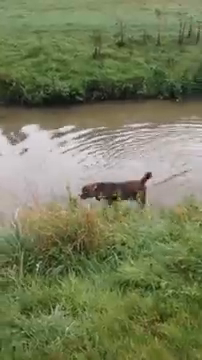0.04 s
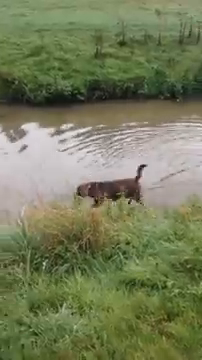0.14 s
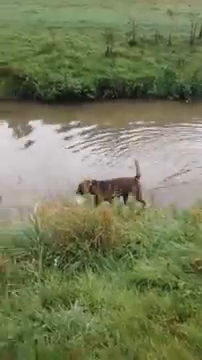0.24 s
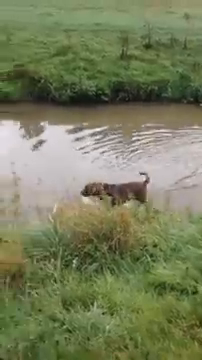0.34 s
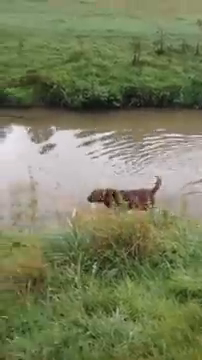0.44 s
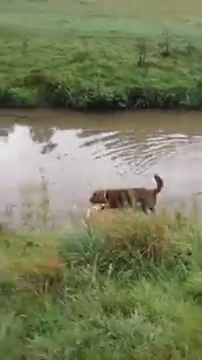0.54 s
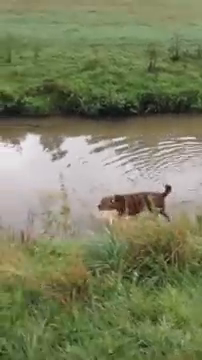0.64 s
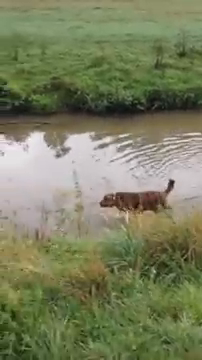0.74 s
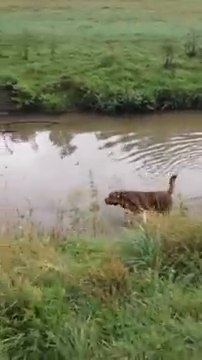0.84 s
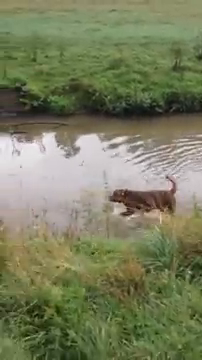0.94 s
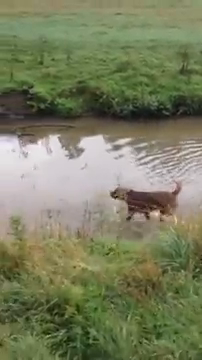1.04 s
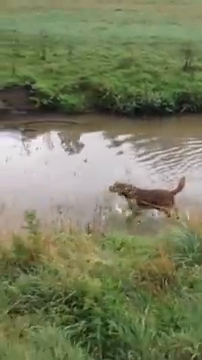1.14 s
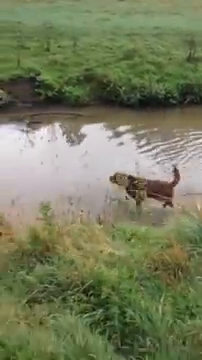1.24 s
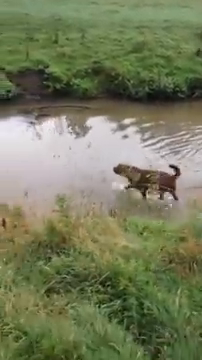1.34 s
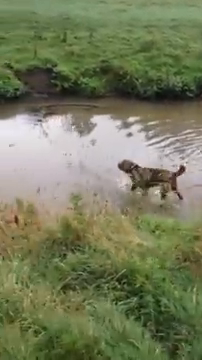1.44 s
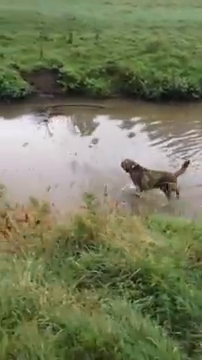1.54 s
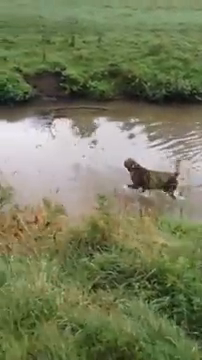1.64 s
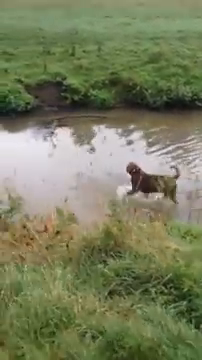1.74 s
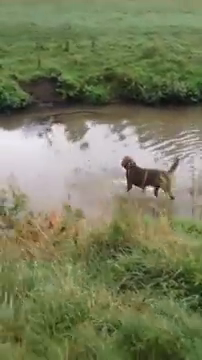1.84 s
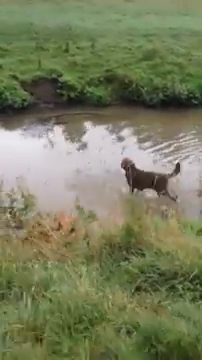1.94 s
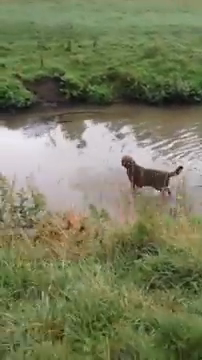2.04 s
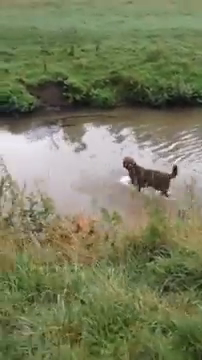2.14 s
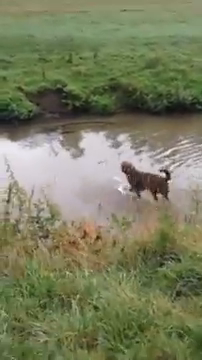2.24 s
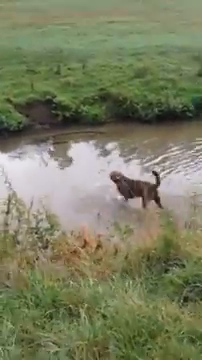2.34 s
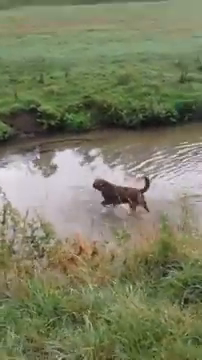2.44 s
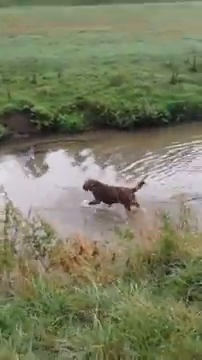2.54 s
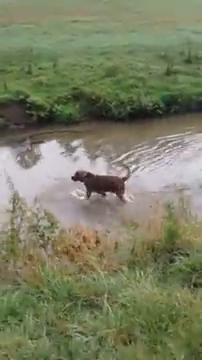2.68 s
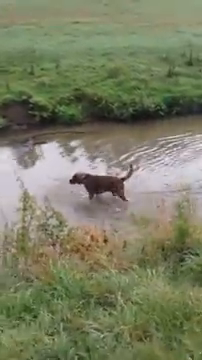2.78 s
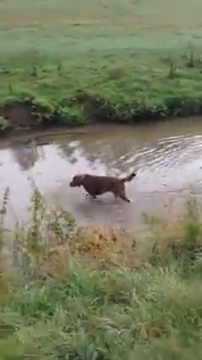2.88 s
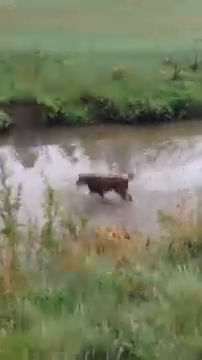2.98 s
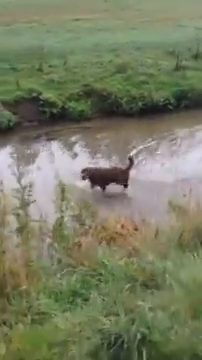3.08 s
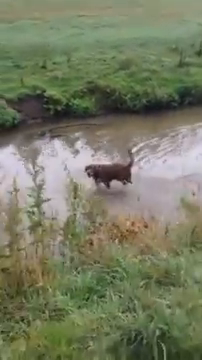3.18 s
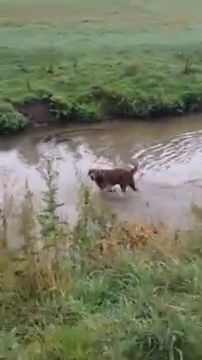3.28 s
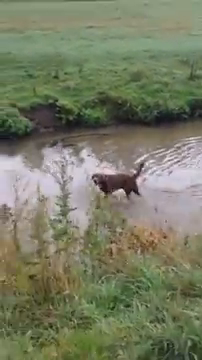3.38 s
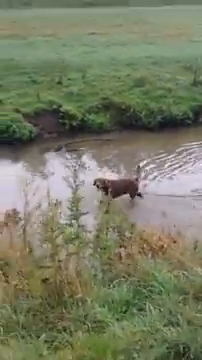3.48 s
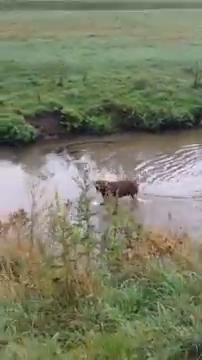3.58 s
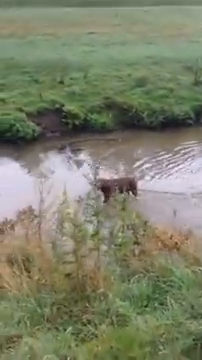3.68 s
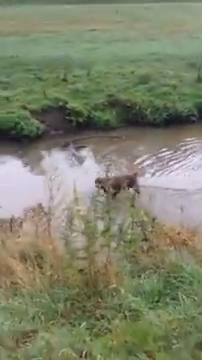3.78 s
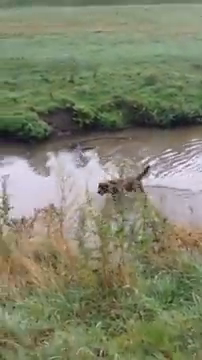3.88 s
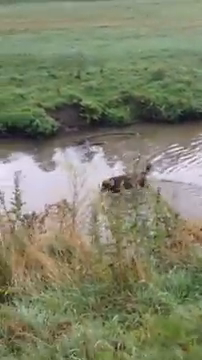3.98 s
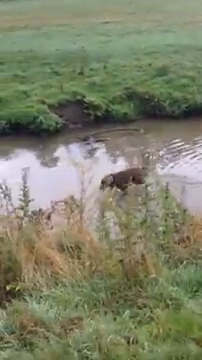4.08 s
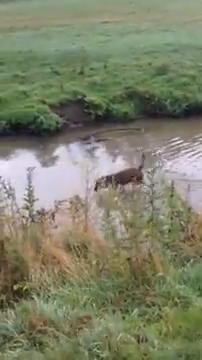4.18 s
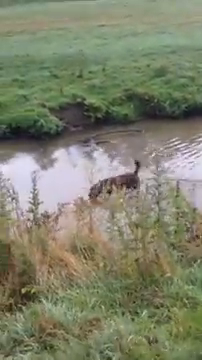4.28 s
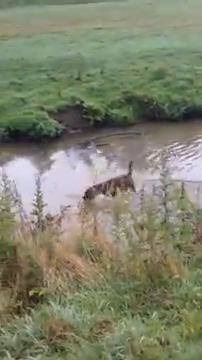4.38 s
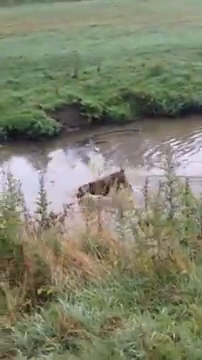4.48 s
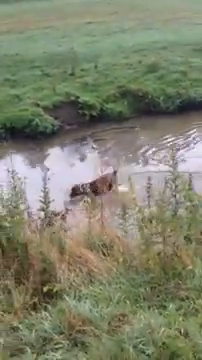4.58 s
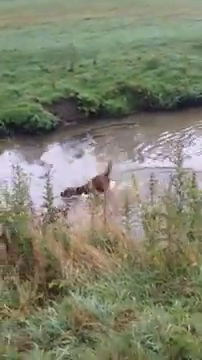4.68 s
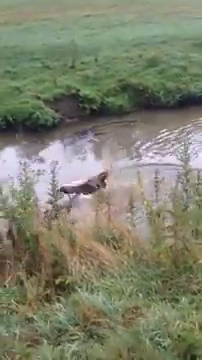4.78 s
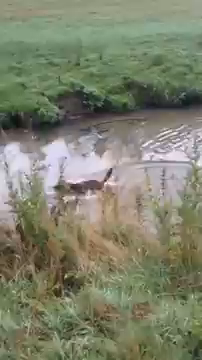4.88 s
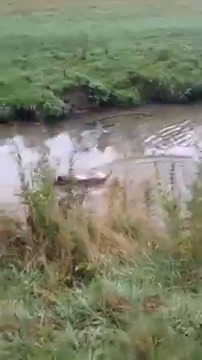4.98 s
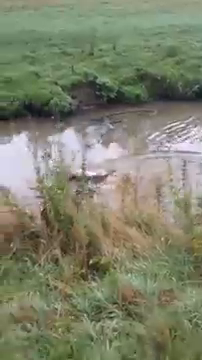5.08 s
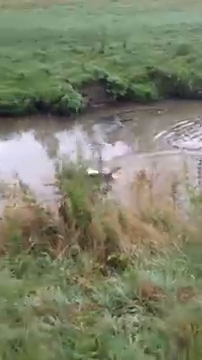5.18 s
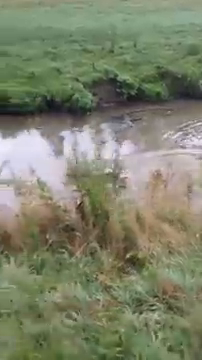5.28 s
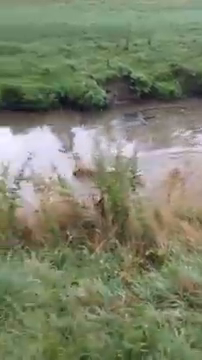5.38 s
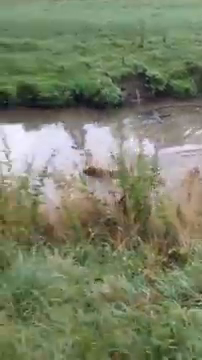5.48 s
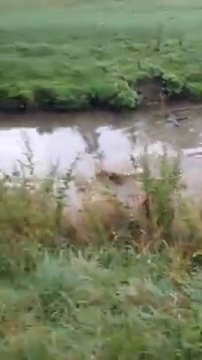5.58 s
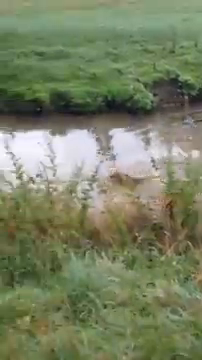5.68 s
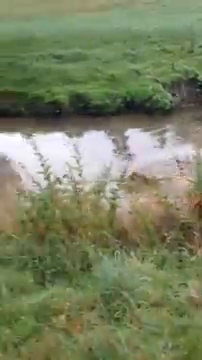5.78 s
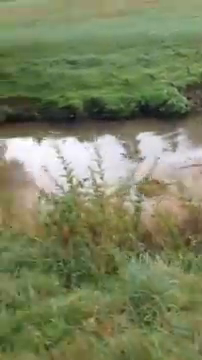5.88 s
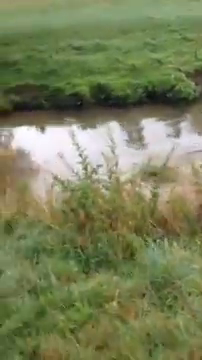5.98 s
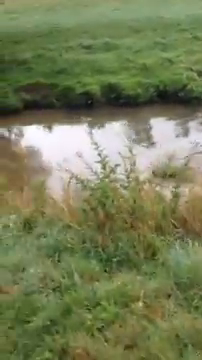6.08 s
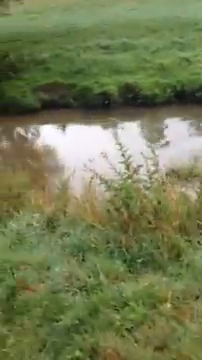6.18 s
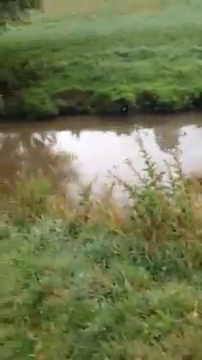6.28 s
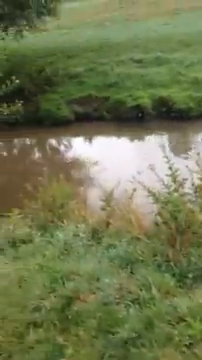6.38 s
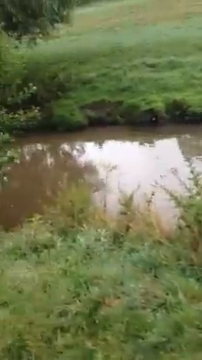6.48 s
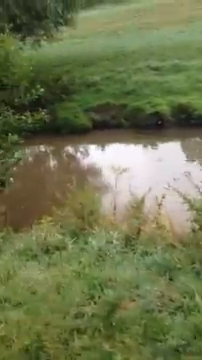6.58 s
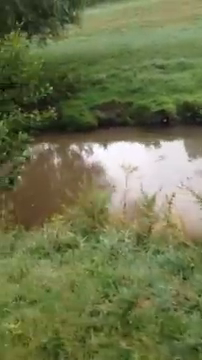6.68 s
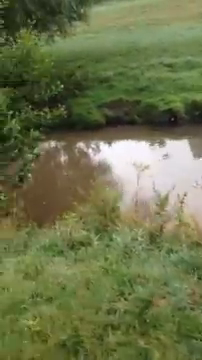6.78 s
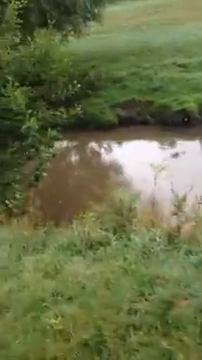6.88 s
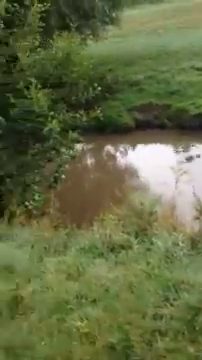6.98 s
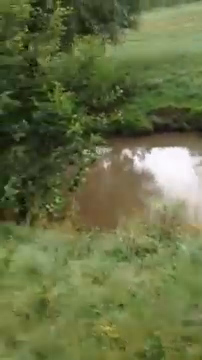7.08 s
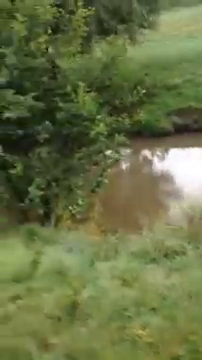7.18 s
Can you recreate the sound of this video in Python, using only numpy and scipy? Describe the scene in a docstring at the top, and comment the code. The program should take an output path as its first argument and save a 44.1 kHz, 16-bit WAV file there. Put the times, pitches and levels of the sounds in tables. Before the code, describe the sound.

A dog wades along a shallow river, its legs making irregular splashes, bubbly plops and a patter of spray. The sound turns deeper and more gurgling as it starts to swim, then fades to small drips, with two faint grunts farther off. Heard from a grassy bank, where light wind thumps on the microphone, tall grass rustles softly near the end and the open field hisses quietly.

```python
"""Splashes and plops of a dog wading, then swimming, along a shallow river, heard from the grassy bank.
Each leg stroke traps air that rings as short bubbles, slaps the surface and throws spray.
Late on, farther off, come two soft grunts. Close by, a light wind buffets the microphone
and tall grass brushes near it; the open field hisses quietly behind."""
import sys
import numpy as np
from scipy import signal
from scipy.fft import rfft, irfft
from scipy.io import wavfile
from scipy.ndimage import uniform_filter1d

SR = 44100
rng = np.random.default_rng(int(sys.argv[2]) if len(sys.argv) > 2 else 0)


def materialize(psi):
    """Save the field psi as 16-bit PCM at rate SR to the path in sys.argv[1].

    A 1-D psi becomes a single channel; in a 2-D psi each row is a channel.
    """
    bounded = np.clip(np.atleast_2d(psi).T, -1, 1)
    quanta = np.round(bounded * 32767).astype(np.int16)
    wavfile.write(sys.argv[1], SR, quanta)


N = 318843

# The dog's legs, out in the river: peak_s, spray_db, gurgle_db, rise_s, fall_s (both per 10 dB)
LEG_STROKES = [(0.02, -47, -56, .04, .03), (0.1, -47.5, -47, .06, .22), (0.26, -47, -64, .03, .08),
               (0.363, -52, -56, .02, .04), (0.46, -48, -45, .08, .05), (0.62, -50, -62, .06, .2),
               (0.747, -46, -54, .012, .015), (0.84, -46, -47, .06, .03), (1.22, -47, -44, .08, .04),
               (1.6, -45, -45, .12, .1), (1.92, -47, -46, .04, .2), (2.335, -52, -52, .04, .03),
               (2.393, -45, -42, .008, .04), (2.745, -48, -45, .03, .1), (2.92, -52, -56, .05, .05),
               (2.98, -48, -46, .04, .07), (3.265, -48, -47, .03, .1), (3.46, -49, -49, .09, .07),
               (3.75, -53, -42, .08, .1), (3.93, -55, -54, .04, .06), (4.21, -54, -48, .04, .1),
               (4.39, -46, -48, .08, .24), (4.67, -52, -44, .05, .2), (4.765, -42.5, -49, .11, .11),
               (5.05, -46.5, -49, .17, .06), (5.41, -51, -54, .3, .1), (6.44, -61, -62, .03, .2),
               (6.73, -58, -55, .02, .14)]
# Water pushed aside between strokes as the river deepens: time_s, spray_db, gurgle_db, deep_gurgle_db
WADING = [(0, -54, -62, -9), (.55, -54, -62, -9), (0.93, -49, -55, -8), (1.1, -51, -59, -8),
          (1.5, -49, -62, -6), (2.22, -54, -58, -7), (2.62, -49.5, -53, -7), (2.88, -56, -56, -7),
          (3.17, -53, -54, -5), (3.62, -59, -60, -5), (4.1, -55, -55, -6), (4.5, -56, -53, -1),
          (4.9, -56, -51, 3), (5.5, -58, -56, 2), (6.0, -63.5, -62, 1), (6.36, -66, -67, 1),
          (6.59, -62.5, -64, 1), (6.7, -69, -65, 1), (7.23, -64, -68, 1)]
def paddling():
    """Gains of thrown water and trapped air: leg strokes over steady wading, the air moving quicker."""
    peak_s, spray_db, gurgle_db, rise_s, fall_s = np.transpose(LEG_STROKES)
    thrown_water = np.hypot(swells(peak_s, spray_db, rise_s, fall_s), gain_of(curve(WADING, 1)))
    trapped_air = np.hypot(swells(peak_s, gurgle_db, .8 * rise_s, .8 * fall_s), gain_of(curve(WADING, 2)))
    return thrown_water, trapped_air


# The largest bubbles, heard singly from the bank: start_s, level_db, pitch_hz
PLOPS = [(0.01, -37, 3040), (0.066, -38, 796), (0.107, -38, 1010), (0.108, -37.5, 3370), (0.301, -33, 1480),
         (0.362, -37.5, 680), (0.414, -39.5, 700), (0.422, -37, 1590), (0.448, -36.5, 895),
         (0.467, -39, 2130), (0.553, -39.5, 914), (0.748, -39, 804), (0.803, -36, 650), (0.817, -36, 640),
         (0.839, -28.5, 745), (0.866, -40, 3100), (0.906, -40.5, 1120), (0.999, -34, 1390),
         (1.194, -35, 814), (1.217, -33, 1220), (1.24, -35, 2020), (1.355, -38.5, 1300), (1.512, -39, 544),
         (1.606, -34, 1150), (1.6125, -27, 1400), (1.666, -43, 2780), (1.906, -38, 1150), (1.911, -31, 510),
         (1.947, -36, 596), (1.952, -34, 1130), (2.006, -39, 2370), (2.012, -29, 1250), (2.064, -43, 880),
         (2.1005, -35, 800), (2.335, -39, 627), (2.389, -21.5, 747), (2.412, -33, 3330), (2.461, -38, 2800),
         (2.477, -42, 290), (2.482, -28.5, 1950), (2.734, -31, 1025), (2.744, -30.5, 602),
         (2.815, -40, 795), (2.967, -38.5, 508), (2.981, -36, 1260), (2.982, -37.5, 2950),
         (3.08, -41, 4040), (3.149, -43, 230), (3.234, -33, 440), (3.2565, -28.5, 1660), (3.281, -38, 2760),
         (3.469, -39, 366), (3.472, -40, 753), (3.472, -47, 227), (3.667, -35, 845), (3.732, -37, 820),
         (3.746, -35, 678), (3.775, -38, 522), (3.927, -36, 597), (4.125, -42.5, 800), (4.18, -39.5, 478),
         (4.206, -24.5, 537), (4.238, -32.5, 567), (4.246, -40, 1430), (4.332, -32.5, 566),
         (4.541, -41, 355), (4.66, -35, 384), (4.662, -35.5, 197), (4.665, -39, 870), (4.676, -39, 270),
         (4.69, -34, 520), (4.695, -38.5, 1020), (4.767, -37, 383), (4.834, -40, 455), (4.951, -42, 178),
         (4.968, -40, 183), (4.988, -42, 250), (5.036, -41, 470), (5.421, -44, 1760), (6.047, -50, 860),
         (6.578, -50, 1130), (6.64, -50, 2750), (6.722, -50, 880), (6.732, -45, 1320), (6.772, -48.5, 626),
         (6.84, -47, 840), (6.926, -51, 2350), (6.93, -48, 1150), (6.998, -53, 2330), (7.036, -53, 2850),
         (7.063, -48, 2880), (7.079, -45, 3660), (7.102, -48, 3640), (7.136, -49, 1880), (7.154, -46, 6700),
         (7.222, -49, 1280)]
def plops():
    """Air pockets ring, large ones for fewer cycles, and each sheds two weaker neighbours."""
    out, chance = np.zeros(N), rng.random((len(PLOPS), 3, 4))
    for (start_s, db, hz), family in zip(PLOPS, chance):
        for k, (length, climb, detune, lag) in enumerate(family):
            is_neighbour = k > 0
            pitch_hz = hz * (1 + is_neighbour * .8 * (700 / hz) ** .4 * (detune - .35))
            cycles = (13 + 6 * length) * (pitch_hz / 700) ** .5
            ring = ringing(pitch_hz, cycles, glide=.03 + .2 * climb, rise_cycles=.6)
            delay_s = is_neighbour * (1.5 + 5 * lag) / hz
            drop_db = is_neighbour * (5.5 + 5 * length)
            add(out, start_s + delay_s, gain_of(db - drop_db) * ring)
    return out


# Colour of the small bubbles around the dog: frequency_hz, density_db
FROTH_SPECTRUM = [(76, -38), (130, -4.5), (345, 1.5), (556, 3.5), (752, 5), (1150, -1.2), (3780, -9.5),
                  (5780, -16), (9000, -18), (11700, -49)]
def froth(thrown_water, trapped_air):
    """A swarm of small bubbles rings: low ones follow the trapped air, high ones the thrown water."""
    deep, low, high = np.zeros((3, N))
    for hz in np.geomspace(130, 8000, 70):
        per_s = 65 * (hz / 1000) ** .8  # smaller bubbles are more numerous
        births = rng.integers(0, N, rng.poisson(per_s * N / SR))
        spread_db = 3.2 + .5 * np.log2(hz / 1000)
        strengths = gain_of(spread_db * np.minimum(rng.exponential(1, len(births)), 5))
        ring = ringing(hz, cycles=rng.uniform(7.75, 21.5), glide=rng.uniform(.017, .49), rise_cycles=1.62)
        at = births[:, None] + np.arange(len(ring))
        swarm = np.bincount(at.ravel(), np.outer(strengths, ring).ravel(), N)[:N]
        voice = unit_rms(swarm) * gain_of(spectrum_db(FROTH_SPECTRUM, hz)) * np.sqrt(hz)
        high_share = np.clip(np.log2(hz / 1000) / .98, 0, 1)
        deep += voice * (hz < 440)
        low += np.sqrt(1 - high_share) * voice * (hz >= 440)
        high += np.sqrt(high_share) * voice
    gurgle = gain_of(-3.5) * unit_rms(low) + gain_of(curve(WADING, 3) - 10) * unit_rms(deep)
    return trapped_air * gurgle + gain_of(-4.8) * thrown_water * unit_rms(high)


# Water slapping the river's surface: start_s, level_db, tilt_db_per_octave (about 4 kHz)
SLAPS = [(0.0094, -31, -4), (0.108, -34.5, -3), (0.259, -28, 1.5), (0.3685, -32, -.5), (0.4304, -32, 5),
         (0.4687, -29.5, -1.5), (0.59, -41, 3), (0.745, -29, .5), (0.828, -34, 3), (1.03, -29, .5),
         (1.1545, -26, 3), (1.222, -27.5, -.5), (1.3762, -35, .5), (1.5583, -35, 3), (1.613, -28, -2.5),
         (1.917, -32, 1.5), (2.0078, -31, -2.5), (2.3403, -30.5, .5), (2.39, -28, -2), (2.4135, -33, .5),
         (2.484, -30, -.5), (2.6244, -37, .5), (2.7434, -32, -1.5), (2.9803, -31, -2.5), (3.07, -45, 9),
         (3.081, -42, 7), (3.122, -42, 9), (3.13, -44, 9), (3.2568, -34, -1.5), (3.4573, -36, -3),
         (3.735, -35.5, .5), (3.929, -40, .5), (3.944, -38, .5), (4.2463, -37, .5), (4.372, -38, 3),
         (4.72, -36, 3), (4.959, -36, 1.5), (5.0597, -31, 1.5), (5.4031, -38, .5)]
def slaps(droplets):
    """A sheet of water lands over a few milliseconds, then spatters."""
    out, t = np.zeros(N), np.arange(4000) / SR
    landing = t / .002
    envelope = (landing * np.exp(1 - landing)) ** 2
    envelope += .09 * (1 - np.exp(-landing)) * gain_of(-60 * t / .05)  # the spatter
    dulled = unit_rms(signal.lfilter([1], [1, -.35], droplets))
    body = gain_of(-13) * band(rng.standard_normal(N), 350, 800)
    noise = np.pad(dulled + body, (0, len(t)))
    octaves = np.log2(np.clip(np.fft.rfftfreq(len(t), 1 / SR), 1000, None) / 4000)
    for start_s, db, tilt in SLAPS:
        piece = noise[round(start_s * SR):][:len(t)]
        sheet = envelope * irfft(rfft(piece) * gain_of(tilt * octaves))
        add(out, start_s - .0012, gain_of(db) * sheet / abs(sheet).max())
    return out


# Colour of the droplets landing around the dog: frequency_hz, density_db
SPRAY_SPECTRUM = [(180, -27), (300, -17), (553, -13.5), (757, 0.5), (2440, -0.5), (3820, 0), (5870, -7.5),
                  (8300, -6.5), (14600, -17), (15600, -28)]
def spray(thrown_water):
    """Thrown water falls back as a ticking hiss of droplets and as slapping sheets."""
    slosh = unit_rms(smooth(rng.standard_normal(N), 1200, 600))
    droplets = hiss(SPRAY_SPECTRUM, size=256, patchy_db=2.2, flicker_db=1)
    sheets = slaps(droplets)
    coarse = signal.sosfiltfilt(signal.butter(2, 5000, fs=SR, output="sos"), droplets)
    # The finest spray follows a stroke only in part, and dulls as the dog draws away.
    follow, loss_db_per_s = .85, .5
    fine_gain = (thrown_water / gain_of(-50)) ** (follow - 1)
    fine_gain *= gain_of(1.3 - loss_db_per_s * np.arange(N) / SR)
    fine = fine_gain * (droplets - coarse) * ticks(per_s=60, spread_db=3.6, depth=.1)
    patter = (coarse + fine) * ticks(per_s=70, spread_db=3.8, depth=.24)
    return gain_of(-2.3 + 1.2 * slosh) * thrown_water * patter + sheets


# Falling hums out on the water, probably the swimming dog: start_s, length_s, pitch_hz, level_db
GRUNTS = [(6.14, .065, 240, -55), (6.43, .105, 234, -57)]
def grunts():
    """Hoarse hums with a weak overtone and a low puff of air, as through a wet nose."""
    out = np.zeros(N)
    pitch_sag, fade_db_per_s = .3, 75
    for start_s, length_s, pitch_hz, db in GRUNTS:
        t = np.arange(0, length_s, 1 / SR)
        phase = 2 * np.pi * np.cumsum(pitch_hz * (1 - pitch_sag * (t / length_s) ** .7)) / SR
        hoarseness = 1 + .28 * unit_rms(smooth(rng.standard_normal(len(t)), 250))
        hum = hoarseness * (np.sin(phase) + gain_of(-6.5) * np.sin(2 * phase))
        puff = gain_of(-10) * band(rng.standard_normal(len(t)), 250, 600)
        envelope = np.sqrt(2) * gain_of(db - fade_db_per_s * t) * signal.windows.tukey(len(t), .3)
        add(out, start_s, envelope * (hum + puff))
    return out


# Colour of the wind right on the microphone: frequency_hz, density_db
WIND_SPECTRUM = [(12, -41), (22, -36), (46, 6.5), (70, 7), (98, 0.5), (176, -12), (265, -36), (660, -120)]
# Gusts reaching the microphone: peak_s, level_db, rise_s, fall_s (both per 10 dB)
GUSTS = [(0.68, -63, .15, .06), (1.33, -51, .14, .03), (1.81, -52, .015, .09), (2.07, -53, .05, .04),
         (2.21, -54, .02, .05), (2.39, -50, .025, .04), (2.48, -48, .04, .09), (2.64, -57, .04, .04),
         (2.79, -53, .07, .12), (3.0, -51, .12, .1), (3.18, -51, .04, .07), (3.4, -64, .1, .3),
         (3.78, -53, .04, .1), (4.02, -63, .08, .05), (4.17, -57, .05, .5), (4.72, -48, .08, .04),
         (4.99, -59, .05, .06), (5.16, -61, .04, .12), (5.33, -59, .06, .2), (5.47, -54, .05, .17),
         (6.03, -63, .06, .06), (6.26, -55, .13, .03), (6.4, -60, .03, .14), (6.72, -56, .07, .02),
         (6.83, -53, .02, .02)]
def wind():
    """Pressure swings slowly where air breaks over the microphone port; hard gusts add a flutter."""
    rumble = hiss(WIND_SPECTRUM, size=4096, patchy_db=3.2, flicker_db=-4.8)
    swing = np.sqrt(smooth(rumble ** 2, 1500, 1500) + .024)
    rumble = unit_rms(rumble / swing ** .68)  # the gust, more than chance, sets how far the air swings
    flutter = band(rumble * abs(rumble), 90, 200)
    breeze = gain_of(-73)
    gust_db = 20 * np.log10(np.hypot(swells(*np.transpose(GUSTS)), breeze))
    return gain_of(gust_db + .9) * rumble + gain_of(3.2 * (gust_db + 49) - 63) * flutter


# Single thumps of wind on the microphone: start_s, level_db, pitch_hz
BUFFETS = [(1.314, -40, 61.9), (1.785, -43, 75.4), (2.026, -45, 70.0), (2.069, -48, 61.9),
           (2.183, -41, 61.9), (2.372, -39, 96.9), (2.463, -38, 88.8), (2.519, -48, 105), (2.75, -39, 80.7),
           (2.813, -41, 78.1), (2.988, -36, 67.3), (3.062, -40, 86.1), (3.143, -40, 102), (4.329, -46, 124),
           (5.435, -45, 56), (5.495, -45, 48), (5.595, -49, 52), (6.239, -46, 75.4), (6.264, -44, 61.9)]
def buffets():
    """An eddy pushes or pulls the diaphragm, which swings a few times and settles."""
    out = np.zeros(N)
    for (start_s, db, hz), (side, length) in zip(BUFFETS, rng.random((len(BUFFETS), 2))):
        thump = ringing(hz, cycles=7 + 3 * length, glide=-.3, rise_cycles=.45)
        add(out, start_s, gain_of(db - 1.5) * np.sign(side - .5) * thump)
    return out


# Colour of the tall grass on the bank: frequency_hz, density_db
GRASS_SPECTRUM = [(600, -25), (1500, -1), (4000, -3), (7000, 1), (11000, -13), (15600, -11)]
# Grass brushing near the microphone: peak_s, level_db, rise_s, fall_s (both per 10 dB)
GRASS_BRUSHES = [(5.56, -59, .05, .2), (5.89, -61, .07, .03), (6.07, -62, .05, .2), (6.43, -64, .03, .25),
                 (7.152, -59.5, .12, .11)]
def grass():
    """Stalks rub softly: a thin hiss roughened by tiny snaps."""
    rubbing = hiss(GRASS_SPECTRUM, size=256, patchy_db=2.5, flicker_db=1.5)
    snaps = ticks(per_s=72, spread_db=-3, depth=.48)
    return swells(*np.transpose(GRASS_BRUSHES)) * unit_rms(rubbing * snaps)


# Colour of the open field in the distance: frequency_hz, density_db
FIELD_SPECTRUM = [(59, -36), (100, 13.5), (412, -5), (1290, -4), (2090, -10.5), (3700, -4), (5080, -9.5),
                  (14600, -7), (15600, -9)]
def field():
    """A quiet, nearly steady hiss lies behind everything."""
    return gain_of(-65) * hiss(FIELD_SPECTRUM, size=1024, patchy_db=.6, flicker_db=.5)


def bank_echoes(sound):
    """The water surface and the banks return a short scatter of echoes."""
    t = np.arange(3000) / SR
    taps = rng.choice([-1., 1.], len(t)) * (rng.random(len(t)) < .15)
    taps *= gain_of(-60 * t / .031) * (t > .003)
    return signal.oaconvolve(sound, taps / np.linalg.norm(taps))[:N]


def ringing(hz, cycles, glide, rise_cycles):
    """A sine that dies by 60 dB over `cycles`; positive glide lifts it like a bubble near the surface."""
    turns = np.arange(int(SR * cycles / hz)) * hz / SR
    envelope = (1 - np.exp(-turns / rise_cycles)) ** 2 * gain_of(-60 * turns / cycles)
    return envelope / envelope.max() * np.sin(2 * np.pi * turns * (1 + glide * turns / cycles))


def hiss(spectrum, size, patchy_db, flicker_db):
    """Coloured noise with drifting patches and a flicker shared by all frequencies."""
    frames, hz = 4 * N // size + 5, np.fft.rfftfreq(size, 1 / SR)
    real, imag, patches = rng.standard_normal((frames, len(hz), 3)).T
    patches = unit_rms(smooth(uniform_filter1d(patches, size // 40, axis=0), 12))
    flicker = unit_rms(smooth(rng.standard_normal(frames), 8))
    db = spectrum_db(spectrum, hz)[:, None] + patchy_db * patches + flicker_db * flicker
    _, noise = signal.istft((real + 1j * imag) * gain_of(db), nperseg=size, noverlap=3 * size // 4)
    return unit_rms(noise[:N])


def ticks(per_s, spread_db, depth):
    """A factor of about one that jumps up for a millisecond at random moments."""
    heights = gain_of(spread_db * np.minimum(rng.exponential(1, N), 4))
    jumps = heights * (rng.random(N) < per_s / SR)
    return 1 + depth * unit_rms(signal.filtfilt([1], [1, -.965], jumps))


def swells(peak_s, db, rise_s, fall_s):
    """Joint gain of events that each climb 10 dB per rise_s, peak, and lose 10 dB per fall_s."""
    t = np.arange(N // 32 + 2) * 32 / SR
    power = np.zeros(len(t))
    for s, top, rise, fall in zip(peak_s, db, rise_s, fall_s):
        power += gain_of(2 * top - 20 * np.maximum((s - t) / rise, (t - s) / fall))
    return np.sqrt(np.interp(np.arange(N) / SR, t, power))


def band(x, low_hz, high_hz):
    """One band of a sound, at rms 1."""
    return unit_rms(signal.sosfilt(signal.butter(2, [low_hz, high_hz], "band", fs=SR, output="sos"), x))


def smooth(x, *sizes):
    """Moving averages, one after another."""
    for size in sizes:
        x = uniform_filter1d(x, size)
    return x


def gain_of(db):
    """Decibels to a factor."""
    return 10 ** (np.asarray(db) / 20)


def unit_rms(x):
    """Scales to rms 1."""
    return x / np.sqrt(np.mean(x ** 2) + 1e-20)


def spectrum_db(spectrum, hz):
    """A spectrum's level at the given frequencies."""
    points_hz, db = np.transpose(spectrum)
    return np.interp(np.log(hz + 1), np.log(points_hz + 1), db)


def curve(rows, column):
    """One column of a timed table at every sample."""
    rows = np.asarray(rows)
    return np.interp(np.arange(N) / SR, rows[:, 0], rows[:, column])


def add(mix, start_s, sound):
    """Mixes a sound in at a time."""
    part = mix[round(start_s * SR):][:len(sound)]
    part += sound[:len(part)]


def scene():
    """From the bank: the dog in the river, its echoes, the field behind, grass and wind up close."""
    thrown_water, trapped_air = paddling()
    dog = plops() + froth(thrown_water, trapped_air) + spray(thrown_water) + grunts()
    return (dog + field() + gain_of(-16) * bank_echoes(dog) + grass() + wind() + buffets())[None]


def record(dry):
    """One microphone on the bank, into a recorder that cuts the highest treble."""
    lowpass = signal.firwin(511, cutoff=15640, window=("kaiser", 9), fs=SR)
    return signal.oaconvolve(dry, lowpass[None], "same")


dry = scene()
out = record(dry)
materialize(out)
```